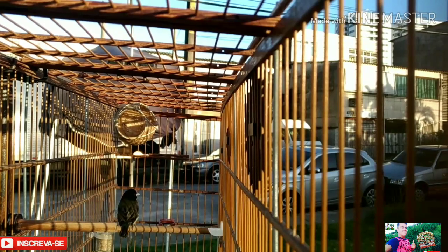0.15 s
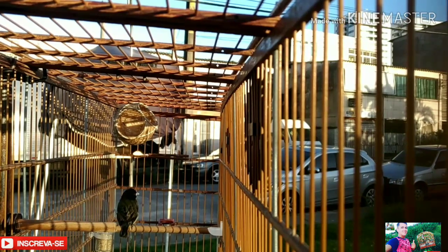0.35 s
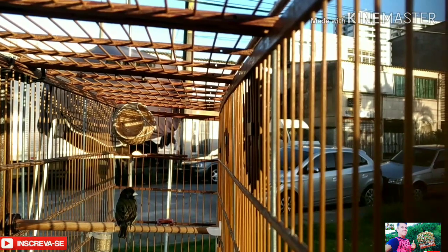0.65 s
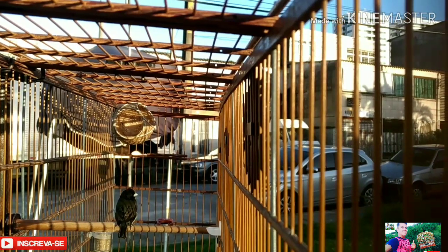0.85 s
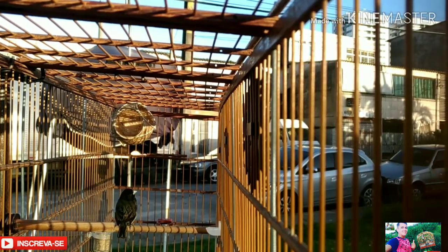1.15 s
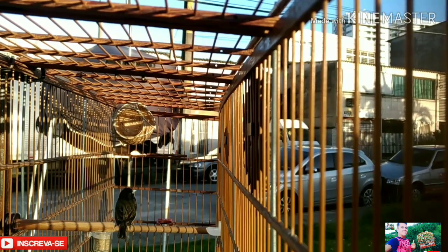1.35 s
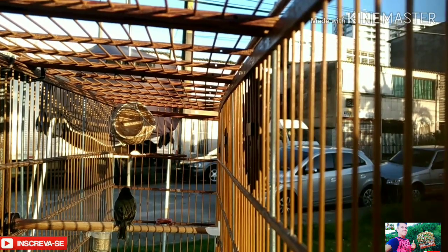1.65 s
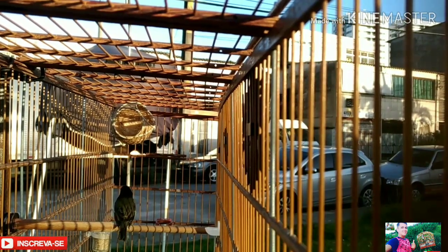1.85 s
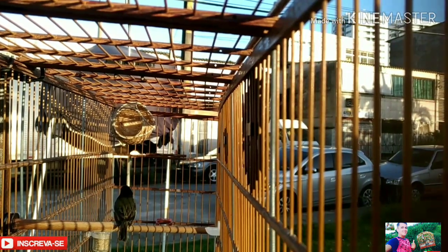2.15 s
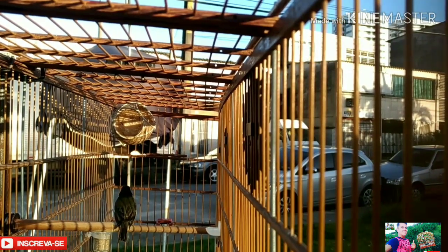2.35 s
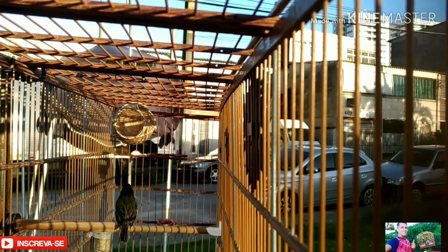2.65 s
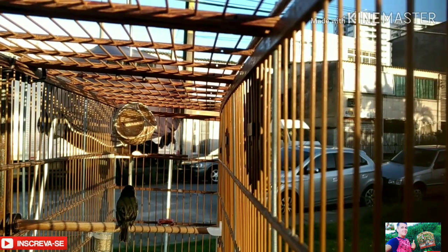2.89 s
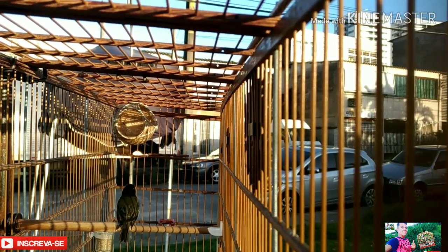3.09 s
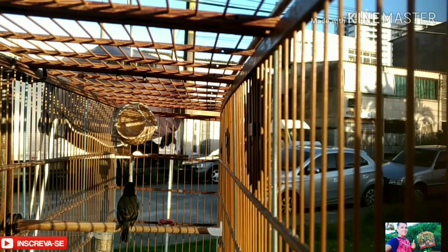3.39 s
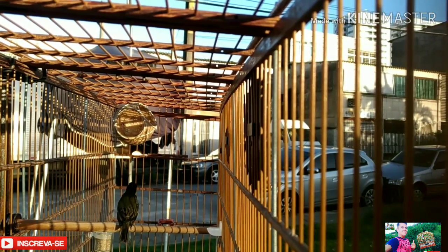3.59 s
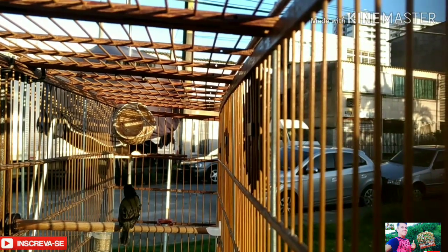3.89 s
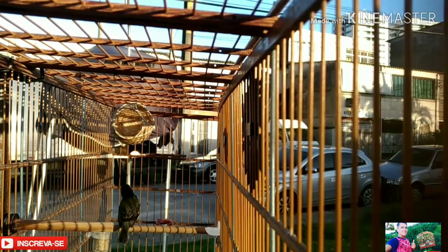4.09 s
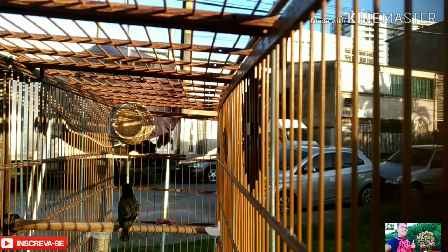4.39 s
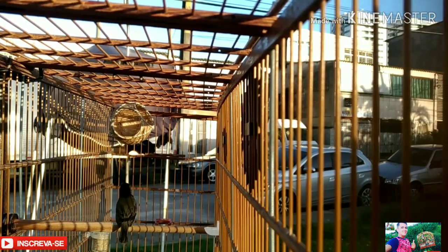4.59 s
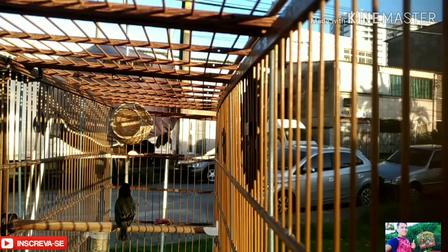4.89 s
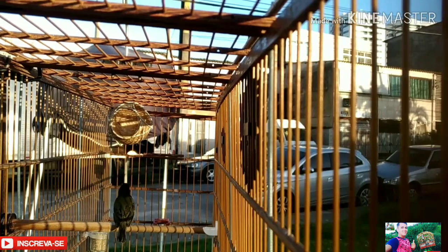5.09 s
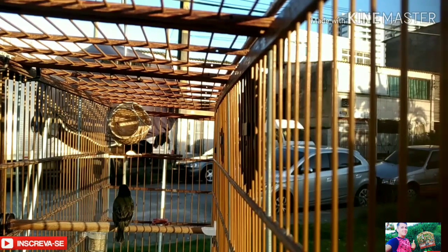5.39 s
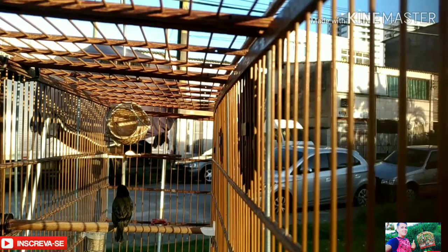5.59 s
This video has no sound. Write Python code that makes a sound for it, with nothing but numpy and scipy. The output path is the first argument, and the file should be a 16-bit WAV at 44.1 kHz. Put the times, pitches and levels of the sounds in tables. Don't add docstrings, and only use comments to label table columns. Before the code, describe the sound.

Quiet traffic murmur and faint high bird calls fill the first half. Then one loud, clear finch phrase lasts just under two seconds, rising through buzzing slurs into a rattle, sliding down twice, twittering in two voices and ending on a short whistle. Close phone pickup, leaning right, with cage reflections and a soft street echo. Afterwards, distant chips and slightly stronger tyre hiss.

```python
import sys
import numpy as np
from scipy import signal
from scipy.fft import rfft, irfft, next_fast_len
from scipy.io import wavfile
from scipy.ndimage import uniform_filter1d, map_coordinates

SR = 44100
rng = np.random.default_rng(int(sys.argv[2]) if len(sys.argv) > 2 else 0)


def boost_factor(decibels):
    exponent = np.asarray(decibels, float) / 20
    return 10 ** exponent


def dump(signal):
    limited = np.clip(np.atleast_2d(signal).T, -1, 1)
    pcm = np.round(limited * 32767).astype(np.int16)
    wavfile.write(sys.argv[1], SR, pcm)


N = 253134


def unit(x):
    return x / np.sqrt(np.mean(x ** 2) + 1e-20)


def along(points, hz):
    f, v = np.transpose(points)
    return np.interp(np.log(hz + 1), np.log(f + 1), v)


def wobble(rate, size=N):
    knots = rng.standard_normal(int(size * rate / SR) + 4)
    return map_coordinates(knots, [np.arange(size) * rate / SR])


def filtered(x, response):
    m = next_fast_len(N + SR // 2)
    return irfft(rfft(x, m) * response(np.fft.rfftfreq(m, 1 / SR)), m)[..., :N]


def apart(lean_db, lead):
    half = boost_factor(lean_db / 2) * np.exp(.5j * lead)
    return np.array([half, 1 / half])


def patchy(channels, patchy_db, window, across, along_time):
    z = signal.stft(rng.standard_normal((channels, N)), nperseg=window)[2]
    field = uniform_filter1d(rng.standard_normal(z.shape[1:]), size=across, axis=0)
    field = uniform_filter1d(field, size=along_time, axis=1)
    return signal.istft(z * boost_factor(patchy_db * unit(field)), nperseg=window)[1][:, :N]


def rush(spectrum, patchy_db):
    # (frequency [Hz], likeness [0-1])
    likeness = [(60, .5), (125, .6), (300, .75), (700, .4), (1500, .55), (3000, .4), (6000, .2),
                (14000, .1)]
    # (frequency [Hz], difference [dB])
    street_lean = [(60, -1), (130, 0), (290, -1.5), (630, -1.0), (1390, -2), (3040, -8.5), (6680, -4),
                   (14600, -16)]
    left_lead_s = .00045
    pair = patchy(2, patchy_db, 512, 5, 12)
    turn = lambda hz: np.arccos(np.clip(along(likeness, hz), 0, 1)) / 2
    mid_side = lambda hz: boost_factor(along(spectrum, hz)) * [np.cos(turn(hz)), np.sin(turn(hz))]
    mid, side = filtered(pair, mid_side)
    ports = lambda hz: apart(along(street_lean, hz), 2 * np.pi * hz * left_lead_s)
    return unit(filtered(np.array([mid + side, mid - side]), ports))


def street():
    # (time [s], level [dB])
    traffic = [(0.0, -46), (0.05, -45.5), (0.25, -51), (0.3, -45), (1.28, -46), (1.37, -48.5),
               (1.41, -42.5), (1.74, -43), (1.79, -46.5), (1.95, -43), (3.23, -46.5), (3.5, -50),
               (4.33, -51), (4.41, -46), (4.52, -47.5), (5.61, -44.5), (5.74, -49.5)]
    # (frequency [Hz], level [dB per Hz])
    rumble_colour = [(15, -63), (25, -25.5), (31, -24.5), (39, -16.5), (50, -3), (60, 2), (79, -4.5),
                     (99, -7.5), (125, -7.5), (160, -12), (250, -18.5), (315, -21.5), (400, -26.5),
                     (520, -62)]
    # (frequency [Hz], level [dB per Hz])
    hiss_colour = [(150, -23), (250, -10.5), (323, -3), (371, -9.5), (425, -3), (631, -5.5), (723, -6.5),
                   (968, -7), (1480, -12.5), (2160, -13), (3440, -21), (6370, -27.5), (8520, -23.5),
                   (13800, -60), (15000, -63.5)]
    t = np.arange(N) / SR
    strength_db = np.interp(t, *np.transpose(traffic))
    swells_db = .7 * wobble(6)
    rumble = boost_factor(strength_db + 2 + swells_db) * rush(rumble_colour, patchy_db=2.0)

    car_s, car_rise_s, car_db = 4.79, 0.02, 3
    nearer_car_db = car_db / (1 + np.exp((car_s - t) / car_rise_s))
    hiss_db = -52.5 + .05 * (strength_db - strength_db.mean()) + nearer_car_db
    return rumble + boost_factor(hiss_db + 0.34 * wobble(2.1)) * rush(hiss_colour, patchy_db=1.55)


def far_calls():
    # (time [s], start pitch [Hz], level [dB])
    buzzes = [(.0, 8900, -74.5), (1.611, 8800, -68), (1.67, 8500, -72), (1.81, 8600, -69),
              (1.99, 8600, -66.5), (2.15, 8570, -65.5), (2.279, 9000, -67.5), (2.409, 8530, -66.5),
              (2.6, 7820, -67.5), (2.761, 7700, -69.5)]
    # (time [s], length [s], start pitch [Hz], level [dB])
    chips = [(2.525, 0.036, 7900, -68.5), (2.703, 0.023, 7560, -65), (2.842, .03, 7800, -71),
             (4.8, 0.044, 8850, -59.5), (4.883, 0.033, 8000, -66.5), (4.96, 0.062, 9170, -60.5),
             (5.05, 0.025, 8500, -78)]
    # (time [s], length [s], start pitch [Hz], end pitch [Hz], level [dB])
    glides = [(1.1, 0.094, 6300, 5600, -76), (1.24, .13, 6800, 6650, -78), (1.68, .05, 6440, 6040, -79),
              (1.878, 0.15, 4550, 4180, -75.5), (2.184, .08, 6170, 6650, -73),
              (2.342, .06, 7240, 7000, -73), (5.14, .047, 4700, 6100, -64.5),
              (5.21, .05, 4540, 6080, -69.5), (5.3, 0.2, 7350, 4870, -70)]
    buzz_s, buzz_fall, buzz_blur_hz = .1, .9, 540
    chip_sag_hz_per_s, chip_blur_hz, glide_blur_hz = 55000, 70, 100
    calls = [(s, buzz_s, hz, buzz_fall * hz, db, buzz_blur_hz) for s, hz, db in buzzes]
    calls += [(s, length, hz, hz - chip_sag_hz_per_s * length, db, chip_blur_hz)
              for s, length, hz, db in chips]
    return calls + [(*row, glide_blur_hz) for row in glides]


def far_birds():
    out = np.zeros(N + SR)
    for s, length, start_hz, end_hz, db, blur_hz in far_calls():
        u = np.linspace(0, 1, round(length * SR))
        hz = start_hz + (end_hz - start_hz) * u + blur_hz * wobble(310, size=len(u))
        shape = np.sin(np.pi * u ** .7) * boost_factor(3 * wobble(45, size=len(u)))
        out[round(s * SR):][:len(u)] += boost_factor(db + 9.0) * shape * np.sin(2 * np.pi * np.cumsum(hz) / SR)
    return out[:N]


def walls(x, t60_scale):
    # (frequency [Hz], time [s])
    fade_times = [(3000, .6), (4000, .7), (5500, 1.3), (9000, .65)]
    hz, t, z = signal.stft(rng.standard_normal((2, SR)), SR, nperseg=256)
    t60 = t60_scale * along(fade_times, hz)[:, None]
    tail = signal.istft(z * boost_factor(-60 * t / t60), SR, nperseg=256)[1]
    late = np.pad(x, (300, 0))[None]
    return signal.fftconvolve(late, tail / np.linalg.norm(tail[0]), axes=1)[:, :N]


def trills():
    # (time [s], pitch [Hz], level [dB])
    opening = [(2.936, 4080, -52.5), (2.949, 4710, -47.5), (2.955, 4810, -34), (2.976, 4880, -35.5),
               (2.987, 4600, -47.5), (2.995, 4160, -49)]
    # (time [s], length [s], top pitch [Hz], level [dB], trill strength [ratio])
    slur_list = [
        (3.289, .162, 3880, -22, .85),
        (3.494, 0.17, 3919, -21, 1.2),
    ]
    # (share of length [0-1], pitch over top [ratio], level [dB], pitch swing [Hz])
    slur_shape = [(0., .72, -35.5, 40), (.17, 0.782, -6, 48), (.37, .83, -5.5, 180), (.525, .9, -4.5, 175),
                  (.69, .975, 0.5, 22), (.925, 1.001, 0.5, 7), (1., .95, -25.5, 12)]
    # (time [s], pitch [Hz], level [dB], pitch swing [Hz], level swing [0-1])
    rattle_path = [(3.704, 5680, -46, 450, 0.2), (3.725, 5720, -22.5, 320, .15), (3.75, 5446, -21, 440, .3),
                   (3.77, 5080, -24, 440, 0.9), (3.793, 5040, -20, 267, 0.7), (3.822, 4688, -27, 39, .15),
                   (3.857, 4833, -22.5, 10, .05), (3.867, 4575, -55, 10, .05)]
    swing_hz, swings_per_s, depth = 130, 79, 0.26
    lead_in = [(*row, swing_hz, swings_per_s, depth) for row in opening]

    slur_rate, slur_depth = 150, .12
    slurs = []
    for s, length, top_hz, db, strength in slur_list:
        slurs.append([(s + u * length, share * top_hz, db + level_db, strength * swing_hz,
                       slur_rate / strength, slur_depth * strength * (swing_hz > 30))
                      for u, share, level_db, swing_hz in slur_shape])

    first_rate, last_rate, settle_s = 270, 132, .045
    start_s = rattle_path[0][0]
    rate = lambda s: last_rate + (first_rate - last_rate) * np.exp((start_s - s) / settle_s)
    rattle = [(s, hz, db, swing_hz, rate(s), depth) for s, hz, db, swing_hz, depth in rattle_path]
    return [lead_in, *slurs, rattle]


def chirps(side):
    # (time [s], level [dB])
    clusters = [
        (4.268, 0.),
        (4.418, -1),
    ]
    # (delay [s], length [s], start [Hz], end [Hz], peak level [dB])
    rising = [
        (0., .026, 4500, 5530, -19),
        (0.017, .032, 4050, 5590, -18.5),
        (.04, .031, 4000, 5150, -22),
    ]
    # (delay [s], pitch [Hz], level [dB])
    hook = [(.061, 3680, -40.5), (.074, 3880, -24), (.082, 3796, -23.5), (.104, 3270, -27),
            (.114, 3010, -35.5)]
    peak_at, rise_db, fall_db = 0.67, 23.5, 27
    bend = .35
    # (share of length, share of rise, dB under the peak)
    shape = [(0, 0, rise_db), (peak_at / 2, bend * peak_at / 2, rise_db / 2.23),
             (peak_at, peak_at, 0), (1, 1, fall_db)]
    notes = []
    for s, db in clusters:
        for delay, length, low_hz, high_hz, peak_db in rising[side::2]:
            notes.append([(s + delay + u * length, low_hz + risen * (high_hz - low_hz),
                           db + peak_db - under_db) for u, risen, under_db in shape])
        if side:
            notes.append([(s + delay, hz, db + level_db) for delay, hz, level_db in hook])
    return notes


def voice(notes):
    # (multiple of the pitch [ratio], level against the whistle [dB])
    overtone_list = [(2, -33.5), (3, -39.5), (4, -46)]
    # (frequency [Hz], level [dB])
    beak_colour = [(6000, 6.5), (7000, -8), (8000, 4), (9300, 5.5), (10300, -7.5), (11500, 3), (13000, -6),
                   (14100, 8)]
    break_hz, break_width_hz, break_jitter_hz, jitter_hz = 6900, 550, 110, 9
    trough_db = 13
    out = np.zeros(N)
    for note in notes:
        s, *columns = np.transpose(note)
        t = np.arange(s[0] * SR, s[-1] * SR) / SR
        hz, db, *trill = [np.interp(t, s, c) for c in columns]
        unsteady_db = .3 * wobble(200, size=len(t))
        edge_fade = np.clip(np.minimum(t - s[0], s[-1] - t) / 0.0029, 0, 1)
        loudness = boost_factor(db + 7.5 + unsteady_db) * edge_fade

        pulse, flare_db = 1, 0
        if trill:
            swing_hz, rate, depth = trill
            swing = 2 * np.pi * np.cumsum(rate) / SR
            hz = hz + swing_hz * np.cos(swing)
            pulse = 1 + np.clip(depth, 0, 1) * np.cos(swing - .8)
            flare_db = -trough_db * depth * np.cos(swing)

        shake_hz = jitter_hz + break_jitter_hz * np.exp(-((hz - break_hz) / break_width_hz) ** 2)
        phase = 2 * np.pi * np.cumsum(hz + shake_hz * wobble(350.5, size=len(t))) / SR
        tone = pulse * np.sin(phase)
        for k, over_db in overtone_list:
            rough = k * phase + .8 * wobble(300, size=len(t))
            colour_db = along(beak_colour, k * hz) + 5.1 * wobble(65, size=len(t))
            audible = k * hz < SR / 2.2
            tone += boost_factor(over_db + flare_db + colour_db) * np.sin(rough) * audible
        out[round(s[0] * SR):][:len(t)] += loudness * tone
    return out


def finch():
    # (time [s], pitch [Hz], level [dB])
    whistles_a = [
        [(3.92, 9430, -49.5), (3.946, 8090, -23.5), (3.968, 7700, -24.5), (4.006, 6390, -21),
         (4.058, 5660, -21), (4.065, 5280, -40)],
        [(4.125, 9240, -55), (4.133, 9200, -34.5), (4.159, 8050, -23), (4.175, 7940, -22), (4.228, 5960, -21.5),
         (4.236, 5340, -34)],
        [(4.578, 5410, -34.5), (4.594, 5850, -26), (4.612, 6430, -28), (4.62, 6850, -49)],
    ]
    # (time [s], pitch [Hz], level [dB])
    whistles_b = [
        [(2.988, 3100, -43), (3.006, 3310, -44.5), (3.022, 3394, -33.5), (3.102, 3620, -23.5),
         (3.12, 3450, -50.5)],
        [(4.6, 5920, -23.5), (4.622, 5490, -23), (4.642, 5373, -23), (4.672, 5515, -26.5), (4.678, 5283, -20),
         (4.712, 5187, -24), (4.72, 5040, -47.5)],
    ]
    # (time [s], length [s], level [dB])
    rasps = [(2.918, 0.089, -52), (3.285, 0.017, -57.5), (3.432, 0.0082, -54.5), (3.488, 0.029, -59),
             (3.708, 0.029, -50), (3.911, 0.015, -47), (4.253, 0.092, -35.5), (4.326, 0.049, -47),
             (4.413, 0.092, -37.5), (4.485, 0.058, -58), (4.564, 0.075, -45)]
    # (frequency [Hz], level [dB per Hz])
    rasp_colour = [(1500, -32), (3000, -11.5), (5000, 8), (7000, -6.5), (9000, -2), (10500, -13),
                   (12800, -16.5), (14100, -13)]
    a = voice(whistles_a + chirps(side=0) + trills())
    b = voice(whistles_b + chirps(side=1))
    sum_tones = boost_factor(-18.5) * filtered(a * b, lambda hz: hz > 6000)
    flow = np.zeros(N)
    for s, length, db in rasps:
        size = round(length * SR)
        flow[round(s * SR):][:size] += boost_factor(db) * signal.windows.tukey(size, .4)
    lumps = patchy(1, 5, 128, 3, 5)[0]
    air = unit(filtered(lumps, lambda hz: boost_factor(along(rasp_colour, hz))))
    return a + b + sum_tones + flow * air


def cage(x):
    # (delay [s], left level [dB], right level [dB])
    bounces = [(.0005, -47, -16.5), (.0015, -13.5, -13), (.0018, -24.5, -45.5), (.0024, -17, -16),
               (.0042, -9.5, -11)]
    # (frequency [Hz], difference [dB])
    song_lean = [(2800, 4.5), (3500, -3.5), (4500, -12), (6000, -7), (8000, -9), (10000, -5), (13000, -2)]
    # (frequency [Hz], phase [radians])
    song_lead = [(0, 15), (2840, 6.84), (6800, 13.24), (7920, 19), (11300, 23.8), (12300, 26.5),
                 (14800, 27.5)]
    comb = lambda hz: 1 + sum(boost_factor([[left], [right]]) * np.exp(-2j * np.pi * hz * s)
                              for s, left, right in bounces)
    return filtered(x, lambda hz: comb(hz) * apart(along(song_lean, hz), along(song_lead, hz)))


def song_echoes(song):
    # (frequency [Hz], level [dB])
    wall_colour = [(2800, -9.5), (3500, 3), (4000, -0.5), (6000, -1), (9000, 5), (12000, -9)]
    away = filtered(song, lambda hz: boost_factor(along(wall_colour, hz)))
    relief = rng.standard_normal((2, 500)) * np.hanning(500) / 14
    delayed = np.roll(away, round(.15 * SR))[None]
    facade = boost_factor([[-36], [-33]]) * signal.fftconvolve(delayed, relief, axes=1)[:, :N]
    return facade + boost_factor([[-26], [-22]]) * walls(away, t60_scale=0.67)


def scene():
    others = far_birds()
    blurred = others + .95 * walls(others, t60_scale=.8)
    distant = boost_factor([[-8], [2]]) * blurred
    song = finch()
    return street() + distant + cage(song) + song_echoes(song)


def masked(x, above_db, slope_db, low_db, top_db):
    hz, _, z = signal.stft(x, SR, nperseg=1024)
    bands = np.arange(len(hz)) // 8
    power = np.add.reduceat(np.abs(z) ** 2, np.arange(0, len(hz), 8), axis=1)
    khz = hz[::8] / 1000
    hidden = khz[:, None]
    gap = hidden - khz
    spread = boost_factor(2 * (above_db - slope_db * np.where(gap > 0, gap, -3 * gap)))
    spread += boost_factor(2 * low_db) * (hidden < 1.7)
    spread += boost_factor(2 * top_db) * (np.abs(hidden - 10.5) < 1) * (khz > 7.5) * (khz < 9.5)
    keep = power > spread @ power
    return signal.istft(z * keep[:, bands], SR, nperseg=1024)[1][:, :N]


def band_limit(x):
    return signal.sosfilt(signal.butter(12, 15020, fs=SR, output="sos"), x)


def record(dry):
    power = np.mean(dry ** 2, axis=0)
    hold = np.exp(-1 / (.15 * SR))
    loudness = signal.lfilter([1 - hold], [1, -hold], power)
    gain = (1 + loudness / boost_factor(-52.5)) ** -.08
    hiss = boost_factor(-73) * filtered(rng.standard_normal(dry.shape), lambda hz: hz > 9500)
    top_hz = 14400
    band = filtered((dry + hiss) * gain, lambda hz: 1 / (1 + (hz / top_hz) ** 60))
    finished = masked(band, above_db=-30, slope_db=12, low_db=-47, top_db=-21)
    return band_limit(finished)


dry = scene()
out = record(dry)
dump(out)
```